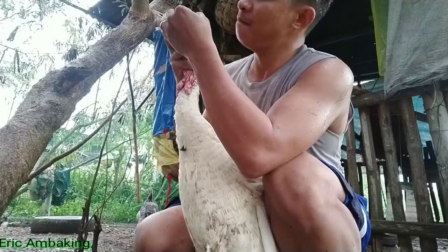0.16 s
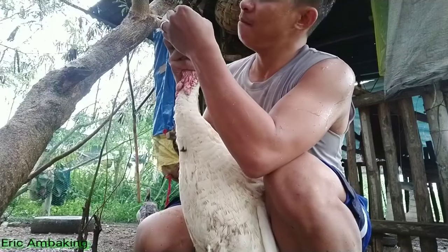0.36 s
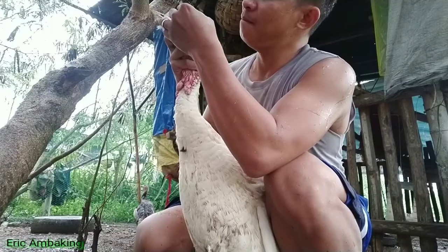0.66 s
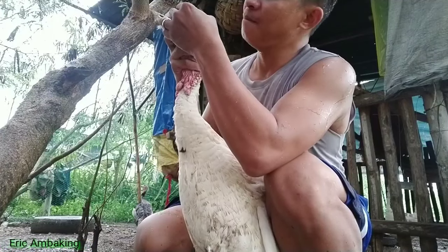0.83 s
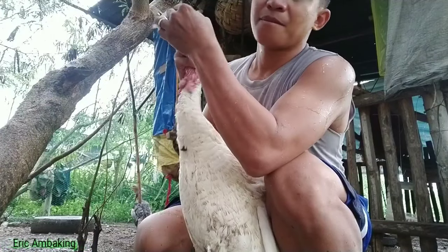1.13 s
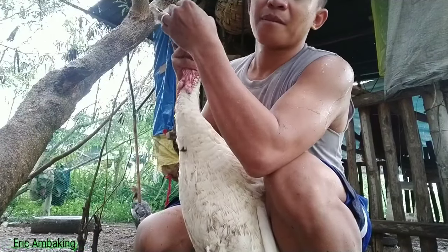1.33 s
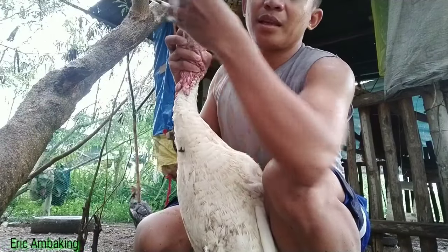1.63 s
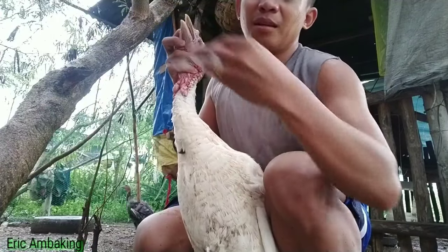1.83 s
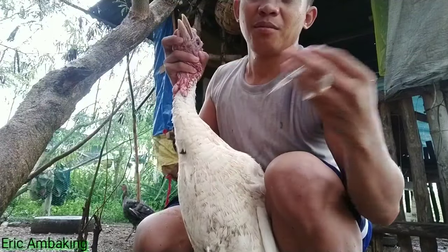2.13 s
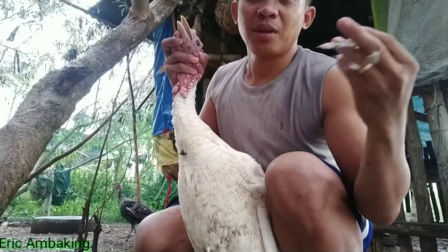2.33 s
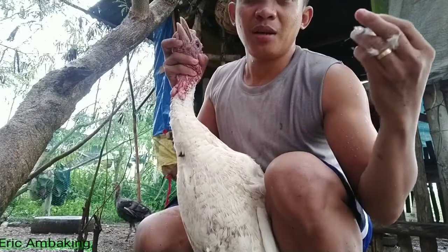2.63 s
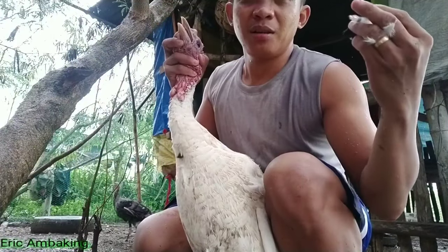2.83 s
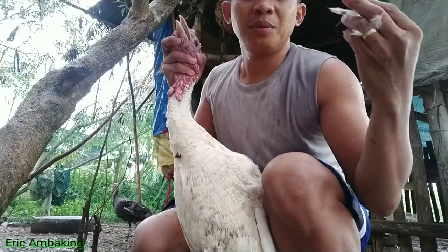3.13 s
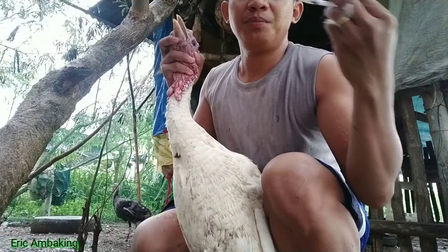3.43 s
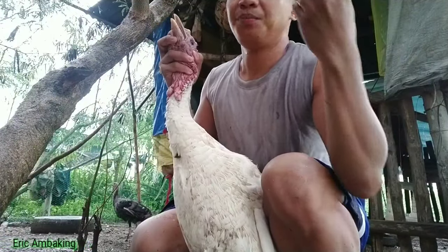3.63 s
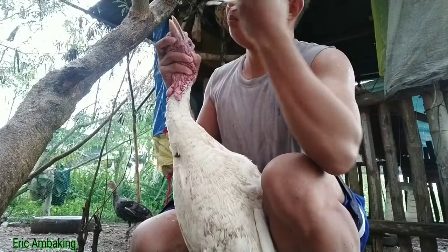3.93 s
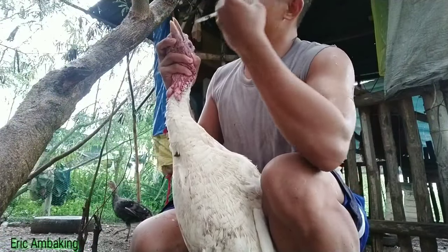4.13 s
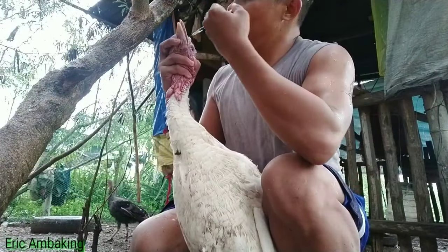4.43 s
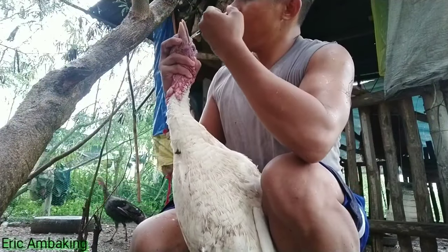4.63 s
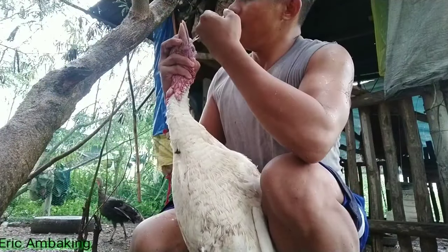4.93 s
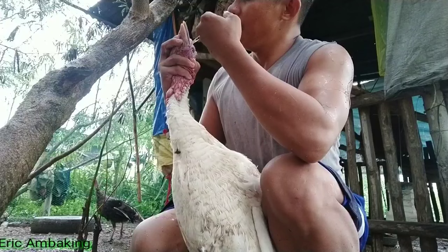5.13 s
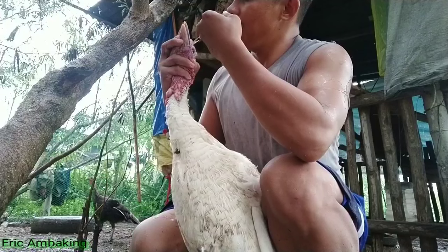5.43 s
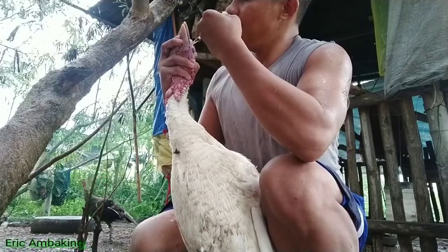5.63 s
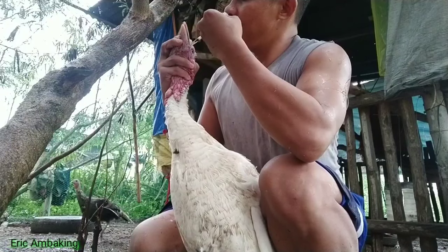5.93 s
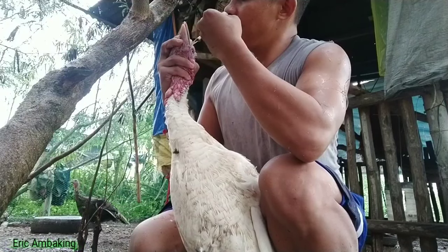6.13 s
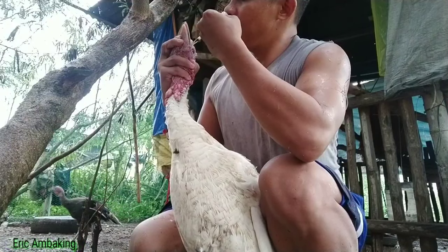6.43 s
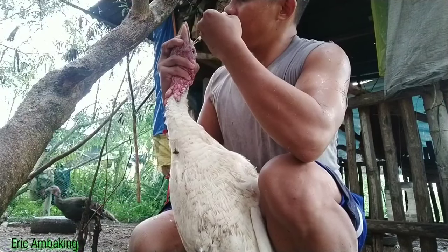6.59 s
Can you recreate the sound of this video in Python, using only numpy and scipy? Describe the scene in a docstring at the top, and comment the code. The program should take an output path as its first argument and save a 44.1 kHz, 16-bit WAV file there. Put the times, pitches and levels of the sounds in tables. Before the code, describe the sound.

Outdoors in a yard, a soft pattering hiss and a distant low drone run under poultry calls. Far fowl and thin chick peeps are heard first, then a near turkey, slightly to the right, yelps loudly three times, whines and yelps again. The flock replies with whistles and chirps among a few wooden knocks and brief rustles. After a lull, the turkey gives three more yelps and a last one, with slight echo.

```python
"""A turkey yelps in a backyard, close to a phone: a loud cluck, a falling whistle, a buzzy low note. Its syrinx
flips between a buzzy low register and a nearly pure high one. It also whines and murmurs; others answer with
rising whistles and chirps, and fowl call and chicks peep further off. Behind them lie a pattering hiss, a low
distant drone and a few taps, ticks and rustles. Two microphones pick up the birds and the yard's echoes; the
loudest clucks are flattened at their peaks."""
import sys
import numpy as np
from scipy import signal
from scipy.fft import rfft, irfft
from scipy.io import wavfile

SR = 44100
rng = np.random.default_rng(int(sys.argv[2]) if len(sys.argv) > 2 else 0)


def unload_wav(signal):
    """Save mono or channel-first audio to the path in sys.argv[1] as 16-bit WAV at rate SR, clipped to [-1, 1]."""
    wavfile.write(
        sys.argv[1],
        SR,
        np.round(np.clip(np.atleast_2d(signal).T, -1, 1) * 32767).astype(np.int16),
    )


N = 298116
BREAK_HZ, LOW_END_HZ = 936, 533  # register flip; bottom of a falling note


def undb(db):
    """Decibels to gain."""
    return 10 ** (np.asarray(db) / 20)


def level(x, db=0):
    """Scale to an rms level."""
    return x * undb(db) / np.sqrt(np.mean(x ** 2) + 1e-20)


def shape_db(points, hz):
    """Read (freq_hz, gain_db) points on a log-frequency axis."""
    freq_hz, db = np.transpose(points)
    return np.interp(np.log(np.maximum(hz, 1)), np.log(freq_hz), db)


def bins(x):
    """FFT bin frequencies in Hz."""
    return np.fft.rfftfreq(x.shape[-1], 1 / SR)


def colour(x, points):
    """Filter by (freq_hz, gain_db) points."""
    return irfft(rfft(x) * undb(shape_db(points, bins(x))), x.shape[-1])


def resonate(x, hz, width_hz):
    """Two-pole resonance."""
    return signal.lfilter(*signal.iirpeak(hz, hz / width_hz, fs=SR), x)


def noise_band(size, hz, width_hz):
    """White noise through two resonances, the second twice as wide."""
    return resonate(resonate(rng.standard_normal(size), hz, width_hz), hz, 2 * width_hz)


def walk(rate_hz, size):
    """Smooth random curve, spread about 1."""
    at = np.arange(size) * rate_hz / SR
    return 1.2 * np.interp(at % 2047, np.arange(2048), rng.standard_normal(2048))


def add(out, start_s, x):
    """Mix x in at start_s."""
    i = max(int(start_s * SR), 0)
    n = min(x.shape[-1], N - i)
    out[..., i:i + n] += x[..., :n]


def outdoor_air(flicker_db=2.5):
    """Broad stereo noise, flickering octave by octave."""
    # noise spectrum: freq_hz, density_db
    spectrum = [(25, -19), (43, -31), (64, -7.5), (90, -2.5), (160, -9.5), (300, -16), (450, -20),
                (900, -18), (2200, -24.5), (3800, -32), (7000, -37.5), (11000, -41.5), (15500, -39)]
    # left-right likeness: freq_hz, correlation
    likeness = [(60, 0.99), (130, 0.91), (290, 0.87), (640, 0.54), (1400, 0), (15000, 0)]
    mid, side = rfft(rng.standard_normal((2, N)))
    hz = np.fft.rfftfreq(N, 1 / SR)
    alike = np.clip(shape_db(likeness, hz), -1, 1)
    stereo = mid * np.sqrt(1 + alike) + side * np.sqrt(1 - alike) * np.array([[1], [-1]])
    stereo *= undb(shape_db(spectrum, hz))
    octave = np.log2(np.maximum(hz, 20) / 20)
    bands = (irfft(stereo * np.clip(1 - abs(octave - k), 0, 1), N) for k in range(11))
    return sum(band * undb(flicker_db * walk(14, N)) for band in bands)


def patter(hits_per_s=30, spread_db=5, decay_s=0.0016):
    """Lone tiny impacts, each a decaying noise burst."""
    # impact spectrum: freq_hz, gain_db
    spectrum = [(200, -18), (900, -30), (2500, 13), (4500, 8), (7000, 8.5), (10000, 8), (15000, -19)]
    hits = (rng.random(N) < hits_per_s / SR) * undb(spread_db * np.minimum(rng.exponential(size=N), 3))
    envelope = signal.lfilter([1], [1, -np.exp(-1 / (decay_s * SR))], hits)
    return colour(envelope * rng.standard_normal((2, N)), spectrum)


def background(swell_db=0.39):
    """Air, high hiss and patter swell slightly together over a low drone."""
    air = level(outdoor_air(), db=-39)
    hiss = level(noise_band((2, N), hz=6800, width_hz=1380), db=-55.5)
    impacts = level(patter(), db=-60)
    drone = level(noise_band(N, hz=100.1, width_hz=36.4), db=-42)
    return (air + hiss + impacts) * undb(-swell_db * walk(2.3, N)) + drone


def pitch(t, time_s, hz):
    """Glide between points; jump where the voice breaks upward from its low register."""
    place = np.interp(t, time_s, np.arange(len(time_s)))
    i = np.minimum(place.astype(int), len(time_s) - 2)
    breaks = (hz[1:] > 1.18 * hz[:-1]) & (hz[:-1] < BREAK_HZ)
    part = np.where(breaks[i], np.clip(5 * (place - i) - 2.5, 0, 1), place - i)
    return hz[i] + part * (hz[i + 1] - hz[i])


def syrinx(points, jitter, shimmer, rasp_db, crack, waver_db=0.93, edge_s=0.0049):
    """Membrane tone through (time_s, pitch_hz, level_db, overtones_db); crack adds onset chaos."""
    # throat and beak response: freq_hz, gain_db
    throat = [(1000, 6.5), (1400, 14.5), (1900, 9.5), (2350, -2.5), (2800, -11.5), (3500, -10.5),
              (4500, -28.5), (6500, -12.5), (9000, -40), (14000, -55)]
    time_s, hz, db, overtones_db = np.transpose(points)
    t = np.arange(time_s[0] - 0.003, time_s[-1] + 0.0053, 1 / SR)
    n = len(t)
    hz, overtones_db = pitch(t, time_s, hz), np.interp(t, time_s, overtones_db)
    db = np.interp(t, time_s, db) + waver_db * walk(55.5, n) * np.minimum((t - t[0]) / 0.06, 1)
    low_register = np.clip((BREAK_HZ - hz) / 150 + 0.5, 0, 1)
    chaos = crack * np.exp(-((t - time_s[0] - 0.013) / 0.0068) ** 2)
    detune = jitter * (1 + 2 * low_register) * walk(300, n) + 0.075 * chaos * walk(800, n)
    phase = 2 * np.pi * np.cumsum(hz * (1 + detune)) / SR
    harmonics = np.arange(2, 13)[:, None]
    # high register: membranes hardly close, so partials above the second die away
    closure_db = -14 * (1 - low_register) * np.log2(harmonics / 2)
    weight = undb(shape_db(throat, harmonics * hz) + closure_db)
    weight /= np.sqrt(np.sum(weight ** 2, axis=0))
    flutter = np.array([1 + 2 * shimmer * (1 + low_register) * walk(201, n) for _ in harmonics])
    overtones = undb(overtones_db) * np.sum(weight * flutter * np.sin(harmonics * phase - 0.89), axis=0)
    # air escapes once a cycle, more when the membranes flap irregularly
    air = level(colour(rng.standard_normal(n), [(400, -37), (700, 8.5)] + throat)) * (1 + np.cos(phase))
    air *= undb(rasp_db + 6 * low_register + 14 * chaos) * np.sqrt(1 + undb(2 * overtones_db))
    tone = np.sin(phase) * (1 + shimmer * walk(153.5, n)) + overtones
    fade = np.clip(np.minimum(t - t[0], t[-1] - t) / edge_s, 0, 1)
    return t[0], np.sqrt(2) * (tone + air) * undb(db) * fade


def voice(notes, gain_db, jitter, shimmer, rasp_db, crack=0):
    """Sound notes on the syrinx; their levels are relative to gain_db."""
    out = np.zeros(N)
    for points in notes:
        add(out, *syrinx(points, jitter, shimmer, rasp_db, crack))
    return out * undb(gain_db)


def far_calls():
    """Distant fowl: straight glides, quick attack, longer fade."""
    # calls: start_s, length_s, start_hz, end_hz, level_db, overtones_db
    calls = [ (0.015, 0.14, 1068, 1015, -48, -8), (0.149, 0.043, 760, 700, -43, -22),
             (0.249, .03, 737, 790, -30.5, -25), (0.313, 0.096, 1208, 970, -45.5, -12),
             (0.48, 0.026, 740, 815, -27.5, -9.5), (.54, 0.053, 1250, 1130, -44, -17),
             (1.794, 0.08, 1146, 880, -45, -2), (2.886, 0.15, 1167, 940, -52, -11),
             (4.147, .034, 653, 710, -40.5, -9), (4.377, 0.037, 684, 516, -37, -5),
             (4.454, 0.023, 737, 850, -29.5, -12), (4.641, 0.049, 770, 740, -46, -16), ]
    for start_s, length_s, start_hz, end_hz, db, overtones_db in calls:
        yield [(start_s + u * length_s, start_hz + u * (end_hz - start_hz), db - down_db, overtones_db)
               for u, down_db in [(0, 19), (0.27, 0), (1, 25)]]


def chicks(gain_db=-1.5, jitter=0.0099):
    """Thin, slightly wavering sine peeps."""
    # peeps: start_s, length_s, start_hz, end_hz, relative_db
    peeps = [(0.392, 0.16, 7380, 7020, -55), (0.71, 0.077, 7270, 7600, -53.5),
             (0.803, 0.061, 6200, 6560, -50), (1.145, 0.099, 7230, 7040, -50),
             (1.231, 0.097, 7300, 7200, -46), (1.608, 0.089, 7360, 6840, -52),
             (1.686, 0.087, 7270, 6800, -55), (2.234, 0.1, 7100, 7360, -55),
             (2.334, 0.046, 7400, 7320, -51.5)]
    out = np.zeros(N)
    for start_s, length_s, start_hz, end_hz, db in peeps:
        n = int(length_s * SR)
        hz = np.linspace(start_hz, end_hz, n) * (1 + jitter * walk(154, n))
        peep = np.sin(2 * np.pi * np.cumsum(hz) / SR) * signal.windows.tukey(n, 0.5)
        add(out, start_s, level(peep, db + gain_db))
    return out


def rustles():
    """Brief grainy brushing noises."""
    # brushes: start_s, length_s, level_db
    brushes = [(0.458, 0.045, -46.5), (1.813, 0.061, -42), (2.172, 0.048, -40), (2.822, 0.046, -45),
               (3.104, 0.044, -43), (3.411, 0.035, -42), (4.062, 0.033, -40.5), (4.75, 0.028, -45),
               (4.808, 0.078, -38.5), (5.823, 0.059, -46.5), (6.04, 0.04, -40), (6.381, 0.083, -41)]
    # rustle spectrum: freq_hz, gain_db
    spectrum = [(200, -23), (800, 8), (2400, 3.5), (4000, -9), (7000, -4), (14000, -24.5)]
    out = np.zeros((2, N))
    for start_s, length_s, db in brushes:
        n = int(length_s * SR)
        grains = rng.standard_normal((2, n)) * undb(0.8 * walk(393, n))
        add(out, start_s, level(colour(grains, spectrum) * np.hanning(n), db))
    return out


def taps(contact_s=0.00065):
    """Short blows ring damped wood."""
    # blows: start_s, peak_db, treble_db
    blows = [(.585, -27, -22), (2.054, -26, -20), (3.260, -17.5, -20), (3.405, -19, -25),
             (3.43, -21.5, -16), (4.006, -20, -25), (4.541, -29, -22), (6.115, -25, -16),
             (6.375, -18.5, -20)]
    # wood modes: freq_hz, width_hz, gain_db
    modes = [(448, 68, 26.5), (594, 140, 27), (1030, 40, 18), (1650, 420, -39)]
    out, t = np.zeros(N), np.arange(2048) / SR
    for start_s, peak_db, treble_db in blows:
        push = rng.standard_normal(len(t)) * np.exp(-t / contact_s)
        body = sum(undb(db) * resonate(push, hz, width_hz) for hz, width_hz, db in modes)
        treble = undb(treble_db) * push / abs(push).max()
        add(out, start_s, undb(peak_db) * (body / abs(body).max() + treble))
    return out


def whistles(near, leap_s=0.00814, flick_s=0.018):
    """Near or flock whistles: a low start leaps to a held, arched tone, then flicks up."""
    # calls: start_s, low_s, hold_s, start_hz, end_hz, arch_hz, flick_hz,
    # start_db, end_db, overtones_db, is_near
    calls = [ (.746, 0.022, 0.12, 942, 984, -9.5, 1100, -30.5, -32, -30, 0),
             (1.886, .018, 0.11, 876, 956, 31, 1100, -29, -26, -11, 0),
             (3.368, .031, .15, 900, 950, 85.5, 1270, -29.5, -22, -8, 1),
             (3.468, .022, .13, 950, 1041, -1.5, 1200, -27, -27.5, -24, 0),
             (6.156, .021, .12, 912, 988, -5.5, 1080, -30.5, -28.5, -19, 0), ]
    u = np.linspace(0, 1, 7)
    for (start_s, low_s, hold_s, start_hz, end_hz, arch_hz, flick_hz,
         start_db, end_db, overtones_db, is_near) in calls:
        if is_near != near:
            continue
        low = [(start_s, 631, -33.5, -14), (start_s + low_s, 735, -33, -14)]
        time_s = start_s + low_s + leap_s + u * (hold_s - leap_s / 2)
        hz = start_hz + u * (end_hz - start_hz) + arch_hz * np.sin(np.pi * u)
        held = zip(time_s, hz, start_db + u * (end_db - start_db), np.full_like(u, overtones_db))
        flick = (time_s[-1] + flick_s, flick_hz, end_db - 16, overtones_db)
        yield [*low, *held, flick]


def yelps(cluck_s=0.0175, attack_s=0.0049, flip_s=0.00506, overshoot=1.06, stall_db_per_s=456):
    """A rising cluck flips into a whistle, which may stall, then sags and drops to a buzzy low note."""
    # calls: start_s, cluck_from_hz, cluck_to_hz, cluck_db, cluck_overtones_db, stall_s,
    # whistle_s, start_hz, end_hz, start_db, end_db, overtones_db, drop_s, drop_db
    calls = [ (.931, 630, 840, -15.5, 4, 0.0004, 0.19, 1030, 913, -34, -24, -5, 0.041, -15),
             (1.263, 914, 1031, -8.5, 5.5, 0, 0.1, 1090, 1021, -22.5, -24.5, -10, 0.024, -19.5),
             (1.482, 870, 1081, -9, 5, 0.037, 0.098, 1094, 1062, -20.5, -24.5, -12.5, 0.019, -25),
             (2.626, 772.5, 1044, -8, 2.5, 0, .097, 1180, 1076, -24, -16.5, -8.5, 0.02, -20),
             (5.031, 641, 792, -16.5, 2.5, 0.0098, .176, 965, 897, -35, -28.5, -12, 0.038, -21.5),
             (5.329, 733, 788, -13.5, 8, 0, .09, 1110, 957, -18, -29.5, -9, .025, -22),
             (5.541, 664, 849, -16.5, 8.5, .046, .099, 1055, 980, -27.5, -26.5, -7.5, .016, -34),
             (6.604, 650.4, 828.5, -14, 3.5, 0, 0.15, 1053, 959, -24.5, -25.5, -11.5, .02, -30), ]
    for (start_s, cluck_from_hz, cluck_to_hz, cluck_db, cluck_overtones_db, stall_s,
         whistle_s, start_hz, end_hz, start_db, end_db, overtones_db, drop_s, drop_db) in calls:
        flipped_s = start_s + cluck_s + flip_s
        settled_s = flipped_s + 0.022 + stall_s
        fall_s = flipped_s - flip_s / 2 + whistle_s
        attack_hz = cluck_from_hz + (cluck_to_hz - cluck_from_hz) * attack_s / cluck_s
        flip_db = cluck_db - 1
        release_db = start_db + 0.28 * (flip_db - start_db) - stall_db_per_s * stall_s
        # overtones grow as the beak opens
        cluck = [(start_s, cluck_from_hz, cluck_db - 17, cluck_overtones_db - 1),
                 (start_s + attack_s, attack_hz, cluck_db, cluck_overtones_db - 1),
                 (start_s + cluck_s, cluck_to_hz, cluck_db - 3.5, cluck_overtones_db)]
        flip = [(flipped_s, start_hz * overshoot, flip_db, -11.5),
                ((flipped_s + settled_s) / 2, start_hz * (1 + overshoot) / 2, release_db, overtones_db)]
        sag = [(settled_s, start_hz, start_db, overtones_db),
               (max(fall_s - 0.02, (settled_s + fall_s) / 2), end_hz, end_db, overtones_db),
               (fall_s, 880, end_db - 3.5, overtones_db)]
        drop = [(fall_s + 0.3 * drop_s, 647.4, drop_db, 0),
                (fall_s + drop_s, LOW_END_HZ, drop_db - 17, 1)]
        yield cluck + flip + sag + drop


def chirps(swoop_hz=988, swoop_s=0.016, fall_hz_per_s=36000, edge_db=-37.5):
    """Pitch creeps up, swoops to its top and falls straight down."""
    # calls: start_s, rise_s, fall_s, start_hz, top_hz, level_db, top_db, overtones_db
    calls = [ (1.0, .062, 0.012, 831, 1250, -29, -37, -30),
             (2.097, 0.033, 0.0054, 830, 1380, -20.5, -29, -15),
             (2.185, 0.033, 0.0023, 746, 1146, -28, -49, -13),
             (3.668, .022, 0.033, 954, 1440, -36, -25, -14),
             (3.739, 0.052, 0.014, 850, 1385, -22, -30, -30),
             (6.39, 0.066, 0.021, 836, 1345, -26, -33.5, -16), ]
    for start_s, rise_s, fall_s, start_hz, top_hz, db, top_db, overtones_db in calls:
        end_hz = max(top_hz - fall_hz_per_s * fall_s, LOW_END_HZ)
        yield [(start_s, start_hz, edge_db, overtones_db),
               (start_s + max(rise_s - swoop_s, rise_s / 10), swoop_hz, db, overtones_db),
               (start_s + rise_s, top_hz, top_db, overtones_db),
               (start_s + rise_s + fall_s, end_hz, edge_db, overtones_db)]


def ticks(decay_s=0.0012, gain_db=-2):
    """Tiny sharp bursts of treble noise."""
    # bursts: start_s, relative_peak_db
    bursts = [(1.6057, -20.5), (2.265, -28), (2.4, -21), (2.4804, -17.5), (2.7852, -19), (4.8044, -28),
              (5.892, -23.5), (6.266, -26)]
    out, t = np.zeros(N), np.arange(2048) / SR
    for start_s, db in bursts:
        tick = resonate(rng.standard_normal(len(t)) * np.exp(-t / decay_s), hz=9300, width_hz=5700)
        add(out, start_s, undb(db + gain_db) * tick / abs(tick).max())
    return out


def whine():
    """One drawn-out note steps up into the high register and sinks back."""
    # note contour: time_s, pitch_hz, level_db, overtones_db
    contour = [(2.278, 653, -37, -28), (2.288, 668, -22, -14), (2.318, 759, -28.5, -14),
               (2.326, 925, -23.5, -19.5), (2.364, 943, -27.5, -14.5), (2.384, 1109, -16, -19.5),
               (2.41, 1113, -18.5, -6.5), (2.466, 1036, -21, -11.5), (2.52, 940, -26, 3.5),
               (2.532, 735, -22.5, -1), (2.564, 565, -24.5, 4.5), (2.572, 551, -43, -20)]
    return [contour]


def murmurs(edge_s=0.011, edge_db=9):
    """Soft, bent low-register notes that swell or fade."""
    # calls: start_s, length_s, start_hz, middle_hz, end_hz, level_db, swell_db, overtones_db, unused
    calls = [(3.602, .08, 792, 686, 797, -23, 15, -3.5, 1),
             (3.681, 0.052, 705, 690, 735, -28.5, -3, -12, 1),
             (6.495, 0.043, 589, 659, 547, -27, -13, -9, 1)]
    u = np.linspace(0, 1, 11)
    for start_s, length_s, start_hz, middle_hz, end_hz, level_db, swell_db, overtones_db, _ in calls:
        hz = np.polyval(np.polyfit([0, 0.5, 1], [start_hz, middle_hz, end_hz], 2), u)
        edge = np.maximum(1 - np.minimum(u, 1 - u) * length_s / edge_s, 0)
        db = level_db + swell_db * (u - 0.5) - edge_db * edge
        yield list(zip(start_s + u * length_s, hz, db, np.full_like(u, overtones_db)))


def microphones(x, lag_ms, pan_db=0, shade_hz=1710):
    """Left lags right; the phone's body shades the treble on one side (positive pan_db: left louder)."""
    hz, spectrum = bins(x), rfft(x)
    tilt = undb(pan_db / 2 * np.minimum(hz / shade_hz, 1))
    delay = np.exp(-2j * np.pi * hz * lag_ms / 1000)
    return irfft(np.array([spectrum * delay * tilt, spectrum / tilt]), N)


def yard(x, db, t60_s=0.15, early_db=11, early_s=0.0058):
    """Strong early echoes from ground and shed, then a thin tail from the trees, per microphone."""
    t = np.arange(SR // 2) / SR
    scatter = rng.standard_normal((2, len(t))) ** 3 * (t > 0.002)
    echo = scatter * (undb(-60 * t / t60_s) + undb(early_db) * np.exp(-t / early_s))
    echo /= np.sqrt(np.sum(echo ** 2, axis=1, keepdims=True))
    return undb(db) * signal.fftconvolve(x[None], echo, axes=1)[:, :N]


def scene():
    """Near turkey on the right, flock, far birds and small noises in the yard."""
    near = voice(yelps(), gain_db=1.5, jitter=0.0091, shimmer=0.15, rasp_db=-32, crack=0.64)
    near += voice(whine(), gain_db=2.5, jitter=0.0076, shimmer=0.12, rasp_db=-32)
    near_notes = [*whistles(near=True), *murmurs()]
    near += voice(near_notes, gain_db=2.5, jitter=0.0041, shimmer=0.11, rasp_db=-35)
    flock_notes = [*whistles(near=False), *chirps()]
    flock = voice(flock_notes, gain_db=2.5, jitter=0.005, shimmer=0.096, rasp_db=-35)
    far = voice(far_calls(), gain_db=-1, jitter=0.015, shimmer=0.1, rasp_db=-20) + chicks()
    knocks = taps() + ticks()
    direct = microphones(near, lag_ms=0.4, pan_db=-4.5) + microphones(flock, lag_ms=0.18, pan_db=4.7)
    direct += microphones(far, lag_ms=0.11) + microphones(knocks, lag_ms=0.045)
    echoes = yard(near + flock + knocks, db=-12) + yard(far, db=-0.5)
    return direct + echoes + rustles() + background()


def record(dry):
    """Clip peaks just under full scale, then cut the top."""
    lowpass = signal.ellip(8, 0.1, 50, 15700, fs=SR, output="sos")
    return signal.sosfiltfilt(lowpass, np.clip(dry, -0.97, 0.97))


dry = scene()
out = record(dry)
unload_wav(out)
```